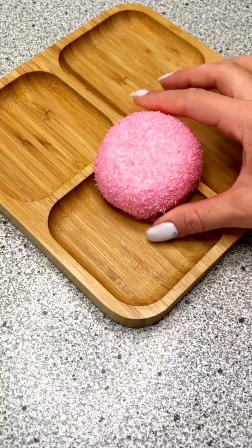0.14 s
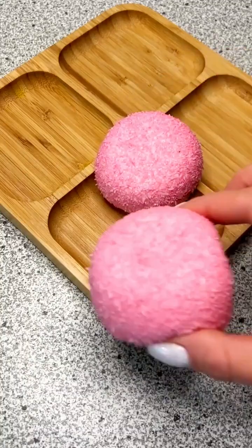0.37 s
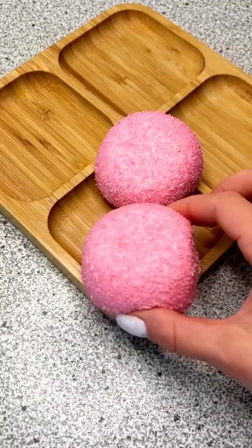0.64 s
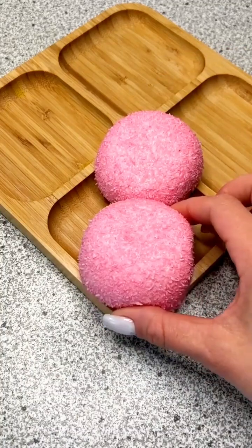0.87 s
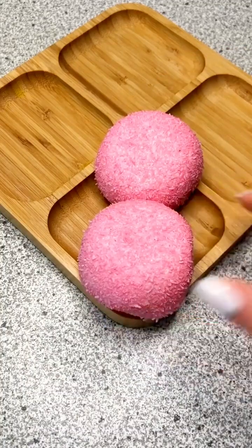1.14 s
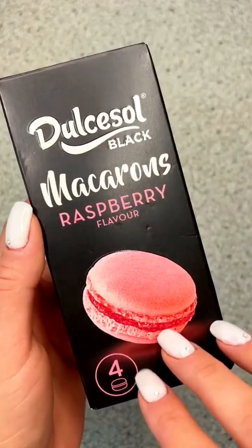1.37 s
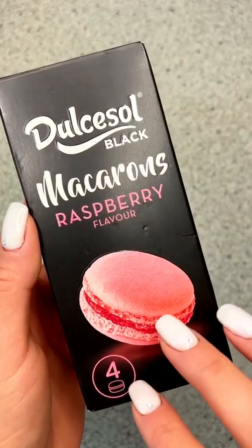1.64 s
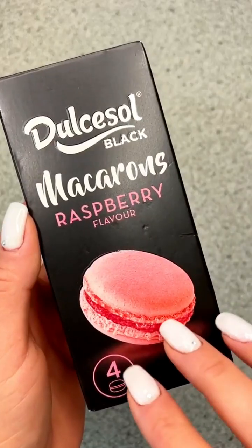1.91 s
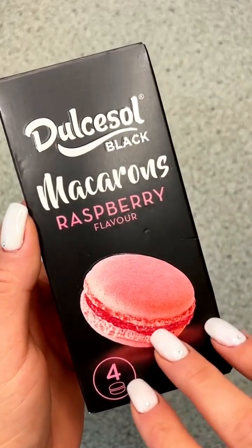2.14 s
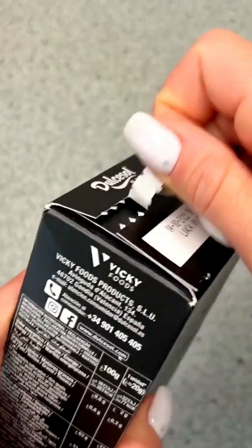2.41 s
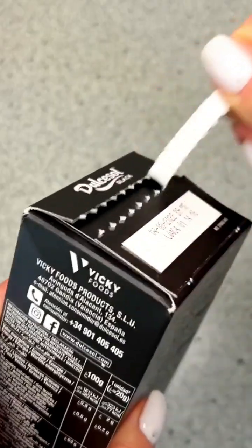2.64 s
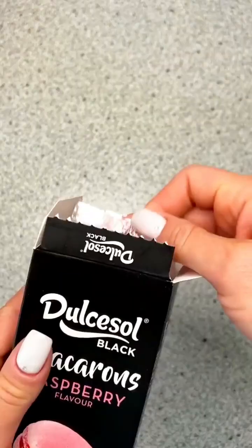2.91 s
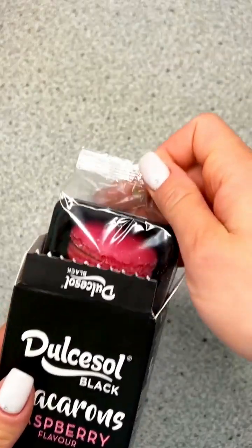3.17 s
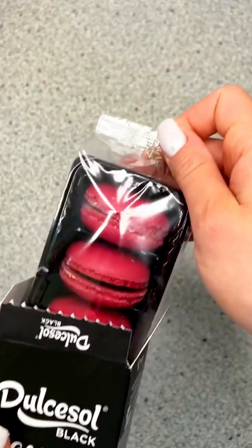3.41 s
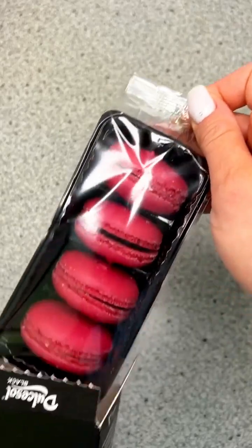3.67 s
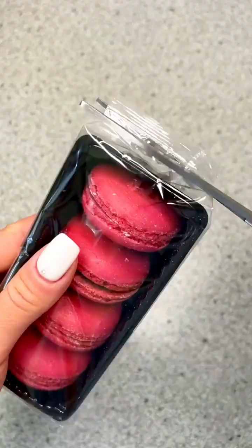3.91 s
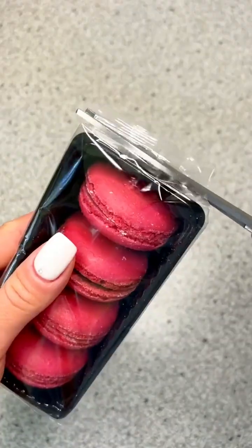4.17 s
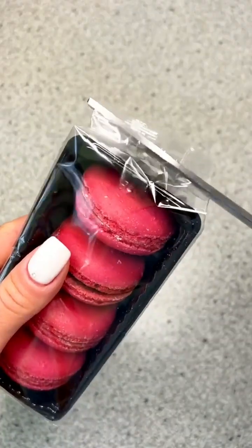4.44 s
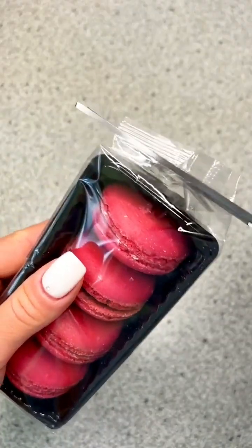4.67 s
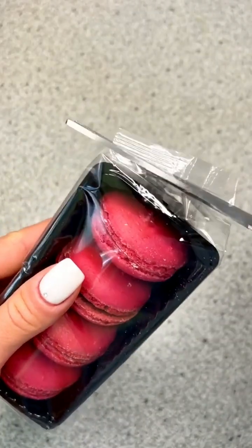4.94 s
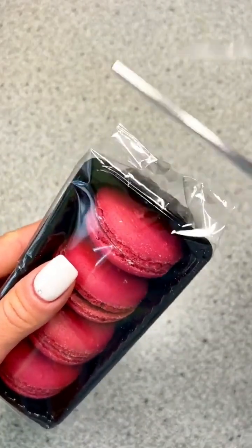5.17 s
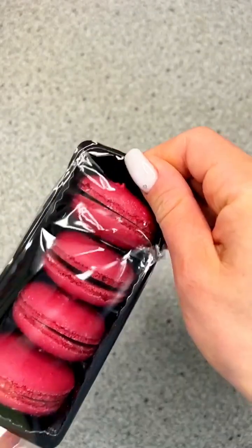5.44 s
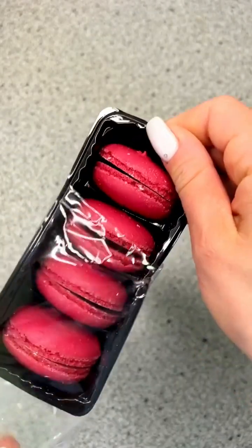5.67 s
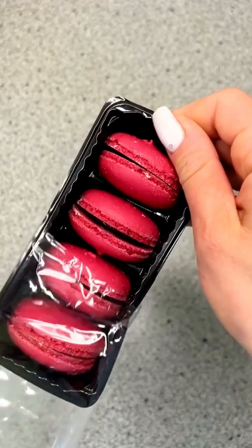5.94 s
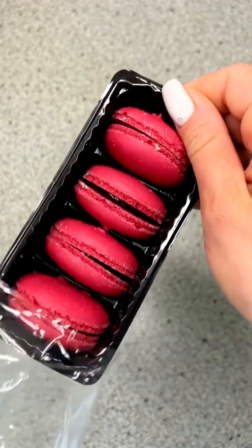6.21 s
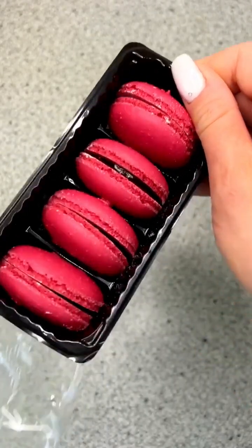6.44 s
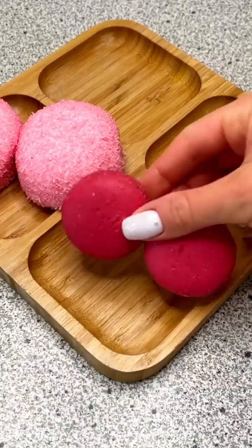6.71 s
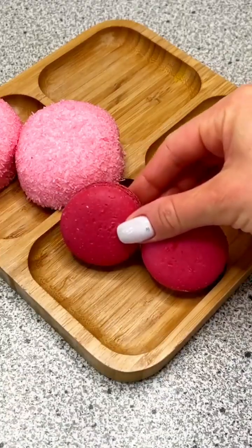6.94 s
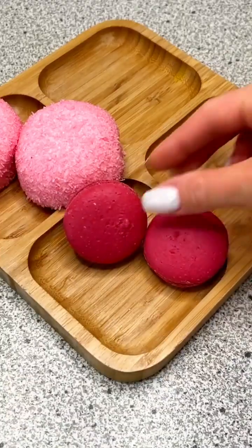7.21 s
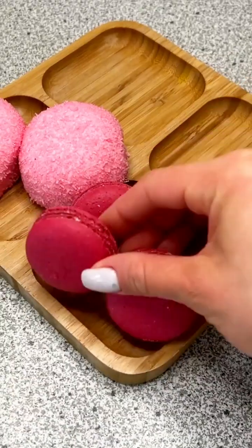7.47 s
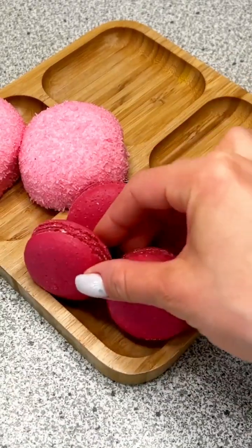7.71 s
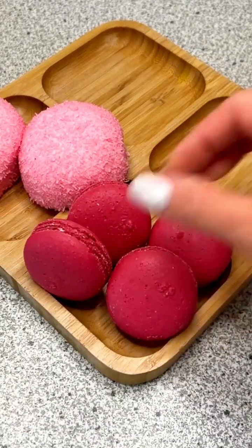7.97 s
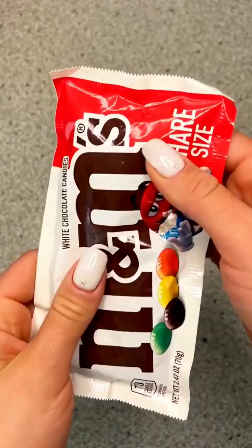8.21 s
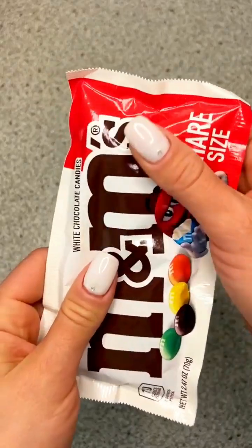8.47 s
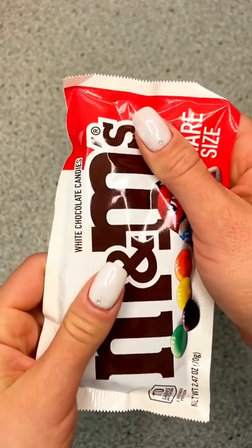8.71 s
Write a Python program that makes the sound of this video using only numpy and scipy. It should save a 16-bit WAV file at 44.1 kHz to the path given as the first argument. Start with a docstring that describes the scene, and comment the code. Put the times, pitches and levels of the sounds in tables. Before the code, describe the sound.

Very close, nearly mono handling sounds with a short furnished-room reverberation. After a hushed second, nails click on a hollow card box; the card jolts and tears. Bright plastic film snaps in bursts through sliding, scissor cutting and a longer, vigorous pull. A near-quiet gap holds a few soft, low biscuit thuds on wood before thinner, sharp bag crackles end abruptly.

```python
"""The faint hush of a small quiet room comes first, with a faint rustle, probably of fingers, near 0.75 s.
Then fingernails drum on a card box close to a phone, its tear strip is ripped off, a film-wrapped tray slides
out, scissors cut the film and the tray is pulled free; soft biscuits are set on a wooden dish and a bag of
sweets is squeezed. Hush and rustle are one shaped noise, box and dish are pushed sets of ringing tones, and
card, film and bag crackle as swarms of tiny buckling snaps."""
import sys
import numpy as np
from scipy import signal
from scipy.fft import rfft, irfft
from scipy.io import wavfile

SR = 44100
rng = np.random.default_rng(int(sys.argv[2]) if len(sys.argv) > 2 else 0)


def file_out(sig):
    """Save sig as 16-bit WAV at sys.argv[1]."""
    # one column per channel
    cols = np.atleast_2d(sig).T
    # limit, then scale
    lim = np.clip(cols, -1, 1)
    pcm = np.round(lim * 32767).astype(np.int16)
    wavfile.write(sys.argv[1], SR, pcm)


def makeup_ratio(level_db):
    """Linear amplitude ratio for a level in decibels (20 dB per factor of ten)."""
    decades = np.asarray(level_db, float) / 20
    return 10 ** decades


N = 390285


def colour_db(table, hz):
    """Reads the level of a (pitch_hz, level_db) colour, with pitch on a log axis."""
    f, db = np.transpose(table)
    return np.interp(np.log(hz), np.log(f), db)


def band(x, hz, ratio):
    """Keeps the sound around hz, at a gain that gives white noise an rms of about 1."""
    low, high = hz / ratio, min(hz * ratio, .45 * SR)
    sos = signal.butter(2, [low, high], "band", fs=SR, output="sos")
    return signal.sosfilt(sos, x) / np.sqrt(2 * (high - low) / SR)


def fade(x, t60):
    """Lets every impulse die away by a factor of 1000 over t60 seconds."""
    return signal.lfilter([1], [1, -np.exp(-np.log(1000) / (t60 * SR))], x)


# level of the background hush from 1.5 to 3 kHz, with a faint rustle, probably of fingers, swelling
# near 0.75 s: start_s, level_db
HUSH_LEVEL = [(0, -75), (.5, -78), (.75, -71.5), (1.098, -77), (8.85, -75.5)]
# how its loudness is shared over pitch: pitch_hz, level_db (per Hz, relative)
HUSH_COLOUR = [(15, -40), (25, 8), (91, -1), (147, -9), (187, -5), (231, -11.5), (460, -18.5), (616, -21),
               (1050, -23), (1400, -22), (2140, -14.5), (4140, -28), (7610, -25.5), (14000, -45.5)]


def background_hush(spread_db):
    """Noise shaped over pitch and swelling with the level table, as a middle part and a left-right part."""
    hz = np.maximum(np.fft.rfftfreq(N, 1 / SR), 1)
    gain = makeup_ratio(colour_db(HUSH_COLOUR, hz))
    reference = (hz > 1500) & (hz < 3000)
    gain = gain / np.sqrt(2 * np.sum(gain[reference] ** 2) / N)
    noise = irfft(rfft(rng.standard_normal((2, N))) * gain, N)
    s, db = np.transpose(HUSH_LEVEL)
    level_db = np.interp(np.arange(N) / SR, s, db)
    return noise * makeup_ratio(level_db + [[0], [spread_db]])


def knocks(events, modes, cycles, scatter_db, tail_db, tail_t60, hold_s,
           tick_hz, tick_t60, rustle_db, rustle_t60):
    """A short push and a noisy low tail ring the modes; a dry tick leads and a faint rustle trails."""
    out, t = np.zeros(N + SR), np.arange(SR // 2) / SR
    hz, db = np.transpose(modes)[:, :, None]
    for s, peak_db, contact_ms, tick_db, spot_hz in events:
        # every knock weights and tunes the modes anew
        chance = rng.standard_normal((2, len(modes), 1))
        mode_db = db + scatter_db * chance[0] - 60 * t * hz / cycles
        ring = makeup_ratio(mode_db) * np.sin(2 * np.pi * hz * (1 + .03 * chance[1]) * t)
        # the mode nearest the spot is boosted
        ring = ring * makeup_ratio(9.7 * np.exp(-(np.log(hz / spot_hz) / 0.097) ** 2))
        # every mode takes a cycle or so to build, so lows come late
        ring = ring * (1 - np.exp(-hz * t / 0.55))

        contact_s = max(contact_ms, .05) / 1000
        push = np.sin(np.pi * np.minimum(t / contact_s, 1))
        # the noise that feeds the tail is cut off after hold_s, as by a noise gate
        tail = makeup_ratio(tail_db - 60 * t / tail_t60) * (t < hold_s)
        tail = tail * rng.standard_normal(len(t)) / np.sqrt(SR / 1000)
        hit = signal.fftconvolve(ring.sum(0), push / push.sum() + tail)[:len(t)]

        tick_level = makeup_ratio(-60 * t / tick_t60) + makeup_ratio(rustle_db - 60 * t / rustle_t60)
        tick = tick_level * rng.standard_normal(len(t))
        tick = band(band(tick, tick_hz, 2.44), tick_hz, 2.44)

        both = hit / np.abs(hit).max() + makeup_ratio(tick_db) * tick / np.abs(tick).max()
        start = int(s * SR)
        out[start:start + len(t)] += makeup_ratio(peak_db) * both
    return out[:N]


# nails on the box: start_s, peak_db (of the ringing), contact_ms, tick_db (relative to the ringing's peak),
# spot_hz (pitch favoured at the spot)
NAIL_TAPS = [(1.211, -26, 0.32, -7.5, 1103), (1.301, -11, 0.091, -7, 1135), (1.326, -19, 0.29, -12, 780),
             (1.649, -20, 0.19, -5, 966), (1.684, -11.5, 0.28, -8.5, 1138), (1.696, -15, 0.17, -9.5, 816),
             (1.976, -15, 0.11, -7.5, 1030), (2.013, -10.5, 0.22, -5, 870), (2.051, -16.5, 0.27, -15, 990)]
# the box jolts as the strip is gripped and ripped off, then as the tray comes free:
# start_s, peak_db, contact_ms, tick_db, spot_hz, as for the nails
BOX_JOLTS = [(2.328, -12.5, 1.6, -30.5, 345), (2.66, -10.5, 2.9, -45, 140), (3.6, -29.5, 5.2, -40, 115),
             (3.707, -30.5, 5, -42, 110)]
# ringing tones of the box walls and the air inside: pitch_hz, level_db
BOX_MODES = [(110, -17.5), (150, -10), (210, -10), (330, -10), (520, -19.5), (805, -2), (930, -16),
             (1050, -4.5), (1200, 1.5), (1350, -4.5), (1750, 3), (2550, 2.5)]


def box_knocks():
    """Nails and jolts ring the dull card box, each tone falling 60 dB in 16 cycles."""
    return knocks(NAIL_TAPS + BOX_JOLTS, BOX_MODES, cycles=16, scatter_db=4.5,
                  tail_db=-14.5, tail_t60=0.055, hold_s=0.24,
                  tick_hz=3300, tick_t60=0.02, rustle_db=-25, rustle_t60=.3)


# the two pitches that part body, middle and sizzle: pitch_hz
ZONE_EDGES = (700, 6000)


def crackle(curve, snaps, colour, lean_db, shower_db, shower_t60, bed_db, rate, spread_db, tint_db,
            snap_t60, big_t60, body_t60, rise_s, crack_db):
    """A swarm of small snaps under a few loud ones: each is a sharp crack and a noise burst with its own tint."""
    s, effort_db = np.transpose(curve)
    start = int(s[0] * SR)
    n = min(int((s[-1] + .2) * SR), N) - start
    t = (start + np.arange(n)) / SR

    # small snaps fall at random, rate of them a second, with random sizes
    most = 4000 * n // SR
    chance = rng.random((most, 2))[:int(rate * n / SR)]
    at = (chance[:, 0] * n).astype(int)
    size = makeup_ratio(spread_db * np.minimum(-np.log(1 - chance[:, 1]), 3.2))

    when, peak_db, body_db, sizzle_db = np.transpose(snaps)
    snap_db = np.array([peak_db + body_db, peak_db, peak_db + sizzle_db])
    loud_at = (when * SR).astype(int) - start

    # third-octave bands share the power of their zone by the colour
    centres = 70 * 2 ** np.arange(0, 7.9, 1 / 3)
    zone = np.digitize(centres, ZONE_EDGES)
    power = makeup_ratio(2 * colour_db(colour, centres)) * centres
    share = np.sqrt(power / np.bincount(zone, power)[zone])

    out = np.zeros(N)
    tint = rng.standard_normal(most + len(when))
    hands_db = np.interp(t, s, effort_db, right=-120)
    for k, (hz, z, gain) in enumerate(zip(centres, zone, share)):
        # small snaps blur together, a big one has its own decay, the body below has another
        t60, loud_t60 = (snap_t60, big_t60) if z else (body_t60, body_t60)
        # neighbouring bands of one crease are tinted alike
        tint = .8 * tint + .6 * rng.standard_normal(len(tint))
        # powers are faded here, so a decay time is halved
        small = np.bincount(at, (size * makeup_ratio(tint_db * tint[:len(at)])) ** 2, n)
        swarm = fade(small, t60 / 2)
        swarm = swarm + makeup_ratio(2 * bed_db) * swarm.mean()  # the finest creases merge into an even hiss
        # a burst peaks at about twice its starting rms
        loud = np.bincount(loud_at, (makeup_ratio(snap_db[z] + 2.2 * tint[most:]) / 2) ** 2, n)

        # the hands keep the swarm going, and every loud snap sets off a shower of small ones
        steady = makeup_ratio(2 * (hands_db + (lean_db[0], 0, lean_db[1])[z]))
        shower = makeup_ratio(2 * shower_db) * fade(loud, shower_t60 / 2)
        effort = (steady + shower) / swarm.mean()

        # a crease creeps a moment before it lets go
        creep = fade(loud[::-1], rise_s)[::-1] - loud
        burst_power = effort * swarm + fade(loud, loud_t60 / 2) + creep
        burst = np.sqrt(burst_power) * rng.standard_normal(n)
        # alternate signs let the bands of one crack add up to a single sharp spike
        crack = (-1) ** k * (makeup_ratio(crack_db) * np.sqrt(loud) + makeup_ratio(-2.5) * np.sqrt(effort * small))
        out[start:start + n] += gain * band(burst + crack, hz, 2 ** (1 / 6))
    return out


# effort of the tearing hands, as the steady swarm's level from 0.7 to 6 kHz: start_s, level_db
TEARING_EFFORT = [(2.272, -66), (2.33, -46.5), (2.49, -41), (2.56, -34), (2.655, -21), (2.73, -57),
                  (2.799, -52), (2.895, -76)]
# loud single rips: start_s, peak_db (0.7-6 kHz, before a random tint),
# body_db (below 0.7 kHz) and sizzle_db (above 6 kHz), both relative to peak_db
RIPS = [(2.324, -12, 0, -3), (2.363, -21, -17, 2), (2.376, -12.5, -1, 2.5), (2.461, -18, -2.5, 3),
        (2.523, -12, -2.5, -1), (2.565, -7, -7, -5.5), (2.588, -14, -8.5, 9), (2.612, -17.5, 4, -11),
        (2.623, -19.5, -3.5, -13.5), (2.648, -6.5, -11, -15.5), (2.655, -6.5, -8, -19),
        (2.781, -25.5, -5.5, -12)]
# colour of torn card: pitch_hz, level_db (per Hz, relative within each zone)
CARD_COLOUR = [(35, -48), (60, -25), (198, -14), (715, -11.5), (803, 13.5), (991, -9), (2190, -4.5),
               (4860, -14.5), (9570, -12.5), (16000, -28.5)]


def tearing():
    """The tear strip gives way as a dense swarm of small card snaps under loud rips."""
    return crackle(TEARING_EFFORT, RIPS, CARD_COLOUR, lean_db=(-3, -1), shower_db=-28, shower_t60=.12,
                   bed_db=-3.5, rate=1300, spread_db=8.5, tint_db=5.0, snap_t60=0.018, big_t60=0.034,
                   body_t60=0.021, rise_s=0.0059, crack_db=7)


# effort in three parts (sliding from the box, cutting, pulling the tray free): start_s, level_db (0.7-6 kHz)
UNWRAPPING_EFFORT = [
    [(2.897, -70), (2.945, -30.5), (3.008, -28.5), (3.047, -29.5), (3.14, -35.5), (3.385, -41),
     (3.583, -38), (3.613, -33.5), (3.69, -33.5), (3.78, -66), (3.927, -65)],
    [(3.927, -46.5), (4.029, -54.5), (4.06, -30.5), (4.17, -35.5), (4.28, -24), (4.364, -46), (4.53, -37),
     (4.65, -48.5), (4.82, -50), (4.92, -40.5), (4.99, -64.5), (5.075, -30.5), (5.208, -50)],
    [(5.208, -50.5), (5.244, -25), (5.331, -35), (5.46, -19.5), (5.663, -34.5), (5.846, -29),
     (5.924, -31.5), (6.019, -29), (6.277, -32.5), (6.316, -27), (6.465, -58), (6.575, -39.5),
     (6.609, -67.5)],
]
# how the steady swarm leans in each part: body_db (below 0.7 kHz), sizzle_db (above 6 kHz), relative to effort
UNWRAPPING_LEAN = [(-10, -5), (-12, -0.5), (-9.5, -2.5)]
# loud single snaps of the film: start_s, peak_db, body_db, sizzle_db, as for the rips
FILM_SNAPS = [(2.927, -31, -13, -1), (2.971, -13.5, -21, -13), (2.981, -7, -35, -9), (2.994, -8, -30, -6.5),
              (3.015, -8.5, -31, -3.5), (3.094, -18.5, -31, 1.5), (3.113, -11.5, -34, -4),
              (3.141, -16.5, -33, 3), (3.171, -22, -27, 1.5), (3.203, -18, -33, 0), (3.266, -21, -23, -16),
              (3.354, -20.5, -15, -24), (3.412, -13, -11.5, 4.5), (3.42, -11.5, -15, -1),
              (3.596, -27.5, 4, -17), (3.834, -27, -11, -18), (4.012, -22.5, -37, 5.5),
              (4.04, -15, -39, -0.5), (4.05, -20.5, -25.5, 3.5), (4.076, -13, -29, -8),
              (4.094, -9, -28, -3.5), (4.132, -21.5, -24.5, 3), (4.141, -15, -29, -16.5),
              (4.177, -15.5, -20, -5), (4.214, -8.5, -29.5, -5), (4.23, -10, -14.5, -5),
              (4.259, -3.5, -19, -3), (4.277, -6.5, -13, 0), (4.285, -7.5, -26.5, 0),
              (4.348, -15, -34.5, -3.5), (4.379, -19.5, -27, 0), (4.39, -22.5, -24.5, -1),
              (4.417, -15, -17, -9), (4.44, -22.5, -9.5, -16), (4.463, -13, -21, -0.5),
              (4.475, -19.5, -16, 3.5), (4.515, -15.5, -35, -5), (4.529, -17, -20.5, 2.5),
              (4.664, -31, -11.5, -1), (4.692, -19.5, -12.5, 0), (4.702, -23, -23, 1),
              (4.751, -18.5, -39, 0.5), (4.832, -30, -0.5, 1), (4.941, -11, -22.5, -5.5),
              (4.948, -17.5, -14, -2), (5.041, -18.5, -28, -5), (5.058, -17.5, -12.5, -3.5),
              (5.078, -11, -12, 2), (5.082, -1.5, -9.5, 1.5), (5.235, -14.5, -23, -20),
              (5.395, -3, -17, -4.5), (5.423, -13.5, -31, 2.5), (5.445, -7.5, -11, -12),
              (5.507, -8.5, -13.5, -1.5), (5.557, -17, -23, -1.5), (5.578, -17.5, -27, 1.5),
              (5.638, -24.5, -28, 3.5), (5.683, -16, -6.5, -7.5), (5.708, -19, -23, 3),
              (5.736, -19, -18, -15), (5.759, -18, -25, -20), (5.83, -11, -11, -18),
              (5.79, -28, -22.5, -11), (5.81, -15, -15.5, -15), (5.853, -14.5, -2, -6.5),
              (5.966, -19.5, -1.5, 5.5), (5.995, -10.5, -30, -16), (6.019, -11, -25, -14),
              (6.066, -5, -39, -11.5), (6.139, -9.5, -12.5, -14), (6.17, -19, -26, -12),
              (6.233, -14, -0.5, 0), (6.303, -26.5, -8, 9), (6.32, -12, -9.5, -3), (6.395, -23, -30, -3),
              (6.484, -27.5, -20, -11), (6.501, -19, -10, -11), (6.554, -23.5, -3, -24),
              (6.568, -16, -3.5, -8), (6.588, -16.5, -26, 0)]
# colour of the film in each part: pitch_hz, level_db (per Hz, relative within each zone)
FILM_COLOURS = [
    [(35, -51), (60, -14), (113, -23), (217, -10.5), (803, 4), (1380, -0.5), (1780, 5.5), (7400, -3.5),
     (16000, -19.5)],
    [(35, -49), (60, -32), (363, -6.5), (527, -13.5), (1060, 2.5), (1410, -6.5), (1820, 4), (6140, 3),
     (16000, -15.5)],
    [(35, -43), (60, -4), (287, 0), (330, 3.5), (946, -2), (2770, 1), (9570, -6.5), (14600, -16.5),
     (16000, -22)],
]


def unwrapping():
    """Stiff film buckles in short snaps while the tray slides out, is cut open and is pulled free."""
    out = np.zeros(N)
    for curve, colour, lean_db in zip(UNWRAPPING_EFFORT, FILM_COLOURS, UNWRAPPING_LEAN):
        snaps = [row for row in FILM_SNAPS if curve[0][0] <= row[0] < curve[-1][0]]
        out += crackle(curve, snaps, colour, lean_db, shower_db=-8, shower_t60=0.045,
                       bed_db=-2.5, rate=700, spread_db=4.5, tint_db=4.0, snap_t60=.013, big_t60=0.013,
                       body_t60=0.018, rise_s=0.0048, crack_db=8)
    return out


# biscuits set down: start_s, peak_db, contact_ms, tick_db, spot_hz, as for the nails
BISCUIT_THUDS = [(6.799, -29.5, 0.9, -28, 255), (6.848, -35.5, 0.99, -13, 153.5),
                 (7.049, -20.5, 0.98, -10.5, 253.4), (7.508, -44, 0.85, -21, 240),
                 (7.573, -46, 0.9, -13, 152.4), (7.666, -40.5, 1, 0, 136.3), (7.691, -41.5, 0.62, 0, 116),
                 (7.751, -28.5, 0.34, -11, 159.7), (7.773, -31, 0.32, -19.5, 200)]
# ringing tones of the wooden dish on the table: pitch_hz, level_db
DISH_MODES = [(95, -6), (124, -2), (160, 0.5), (200, -1.5), (253, 1.5), (328, -15.5), (425, -4.5),
              (520, -26), (850, -9.5), (1500, -13)]


def biscuits():
    """Soft biscuits thud on the dull wooden dish, each tone falling 60 dB in 12 cycles."""
    return knocks(BISCUIT_THUDS, DISH_MODES, cycles=12, scatter_db=5.5,
                  tail_db=-14.5, tail_t60=0.47, hold_s=0.18,
                  tick_hz=1150, tick_t60=0.035, rustle_db=-14, rustle_t60=0.34)


# effort of the squeezing hand: start_s, level_db (0.7-6 kHz)
SQUEEZING_EFFORT = [(8.189, -71.5), (8.222, -38), (8.408, -44), (8.525, -34.5), (8.608, -38.5),
                    (8.635, -25.5), (8.68, -41), (8.806, -45), (8.848, -69)]
# loud single snaps of the bag: start_s, peak_db, body_db, sizzle_db, as for the rips
BAG_SNAPS = [(8.21, -27, -18, -15), (8.217, -12, -18, -3.5), (8.243, -5, -34, -9), (8.271, -16, -34, 8.5),
             (8.365, -18, -19, -35), (8.429, -17, -26, -1.5), (8.441, -13.5, -10.5, -24),
             (8.486, -26.5, 7.5, -17), (8.497, -13.5, -3, -17), (8.518, -4.5, -19.5, 4),
             (8.541, -15, -28, -7), (8.557, -20, -33, -10), (8.626, -18, 2, -17), (8.636, -5, -35, -7.5),
             (8.647, -12.5, -30, -10), (8.7, -11.5, -39, -6.5), (8.709, -17.5, -38, 3),
             (8.726, -21.5, -16, -1), (8.797, -5.5, -30, -20), (8.816, -40, -24, -22)]
# colour of the bag: pitch_hz, level_db (per Hz, relative within each zone)
BAG_COLOUR = [(35, -58), (60, -27), (227, -14.5), (323, 0.5), (666, -9.5), (822, -2), (2090, 2),
              (9570, -9.5), (16000, -32)]


def sweet_bag():
    """The squeezed bag buckles in a thinner swarm of snaps."""
    return crackle(SQUEEZING_EFFORT, BAG_SNAPS, BAG_COLOUR, lean_db=(-9, -4), shower_db=-8, shower_t60=0.063,
                   bed_db=-5, rate=450, spread_db=6.5, tint_db=2.5, snap_t60=0.026, big_t60=0.016,
                   body_t60=0.034, rise_s=0.0028, crack_db=9.5)


# moments where one action is spliced to the next: start_s
SPLICES = [0.392, 2.27, 2.9, 3.93, 5.212, 6.599, 7.362, 8.189]


def spliced(near, effect):
    """Applies an effect to each action on its own: its echo ends at the splice."""
    edges = [int(s * SR) for s in SPLICES]
    return np.concatenate([effect(piece) for piece in np.split(near, edges)])


def room(x, wet_db):
    """A small furnished room: a dense noise tail, thin in the bass, the treble dying first."""
    t = np.arange(int(.6 * SR)) / SR
    noise = signal.lfilter(*signal.butter(2, 290, "high", fs=SR), rng.standard_normal(len(t)))
    low = signal.lfilter(*signal.butter(1, 1500, fs=SR), noise)
    low_t60, high_t60 = 0.42, .22  # seconds
    tail = low * makeup_ratio(-60 * t / low_t60) + (noise - low) * makeup_ratio(-60 * t / high_t60)
    tail = tail * (1 - np.exp(-t / 0.0013))  # the tail builds over about a millisecond
    tail = makeup_ratio(wet_db) * tail / np.sqrt(np.sum(tail ** 2))
    return spliced(x, lambda piece: signal.fftconvolve(piece, tail)[:len(piece)])


# brief sags of the level at some splices: start_s (the deepest moment), level_db
LEVEL_DIPS = [(0.392, -5), (3.929, -8), (7.362, -12.5)]


def dips():
    """A gain that sags for a few hundredths of a second around each listed moment."""
    t = np.arange(N) / SR
    return makeup_ratio(sum(db * np.exp(-((t - s) / 0.022) ** 2) for s, db in LEVEL_DIPS))


def scene():
    """Hands work right in front of the phone, in the middle; room and hush also have a left-right side part."""
    near = box_knocks() + tearing() + unwrapping() + biscuits() + sweet_bag()
    mid, side = background_hush(spread_db=-8.5)
    mid = mid + near + room(near, wet_db=-13)
    side = side + room(near, wet_db=-23.0)
    # the side part is low-passed at 1.8 kHz; above that the sound is mono
    side = signal.sosfilt(signal.ellip(6, .5, 40, 1800, fs=SR, output="sos"), side)
    return np.array([mid + side, mid - side]) * dips()


def band_limit(x):
    """A steep low-pass at the top of the band."""
    return signal.sosfilt(signal.butter(12, 16660, fs=SR, output="sos"), x)


def record(dry):
    """The phone drops the deep bass, rounds the loudest peaks and cuts the top above 16 kHz."""
    thin = signal.sosfilt(signal.butter(2, 70, "high", fs=SR, output="sos"), dry)
    soft = np.tanh(.7 * thin) / .7
    finished = signal.sosfilt(signal.ellip(8, .2, 60, 16000, fs=SR, output="sos"), soft)
    return band_limit(finished)


dry = scene()
out = record(dry)
file_out(out)
```